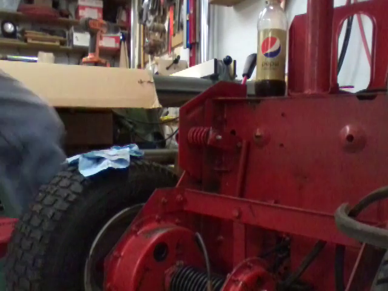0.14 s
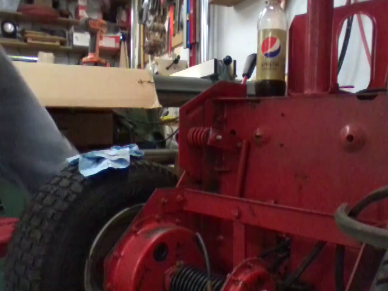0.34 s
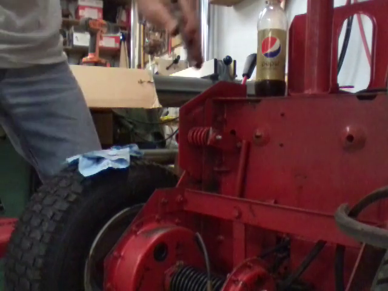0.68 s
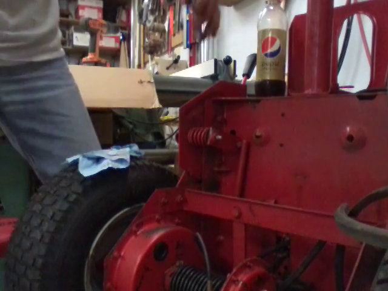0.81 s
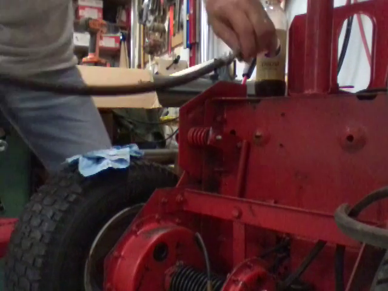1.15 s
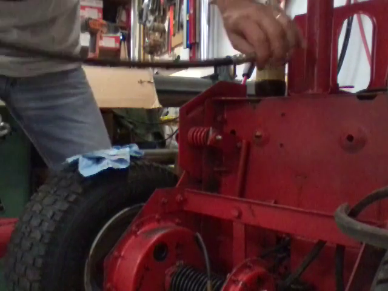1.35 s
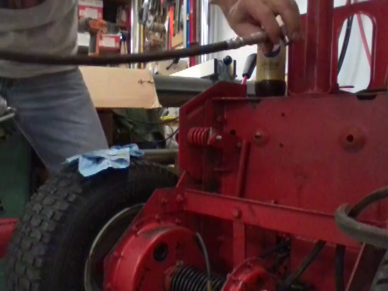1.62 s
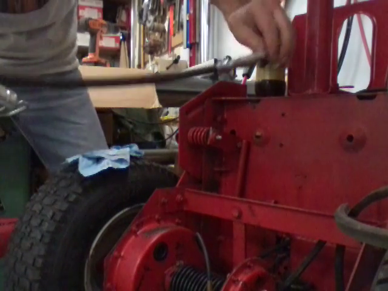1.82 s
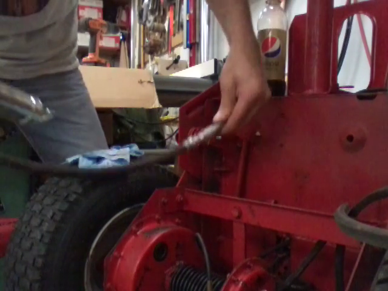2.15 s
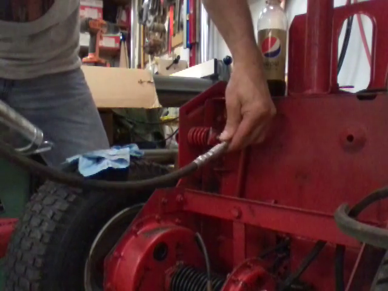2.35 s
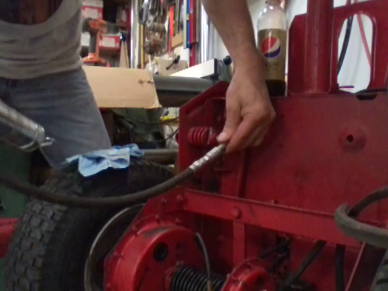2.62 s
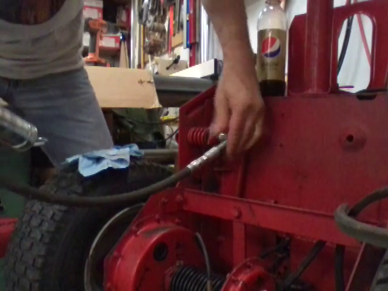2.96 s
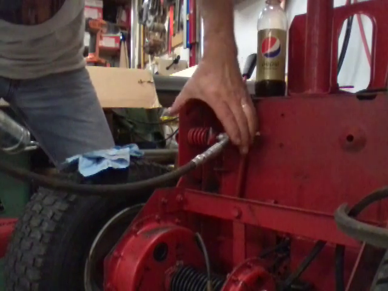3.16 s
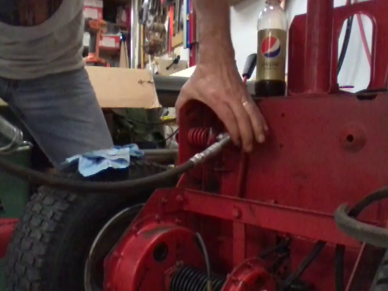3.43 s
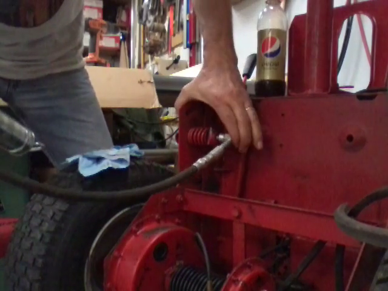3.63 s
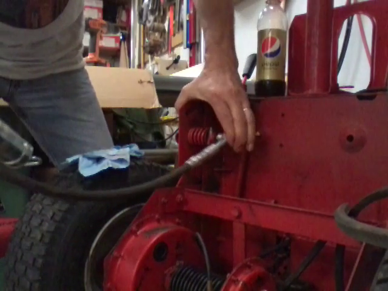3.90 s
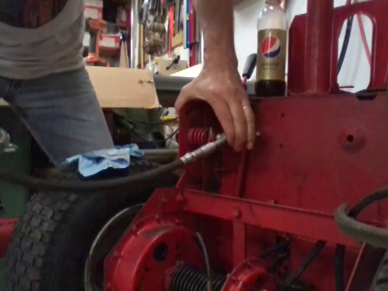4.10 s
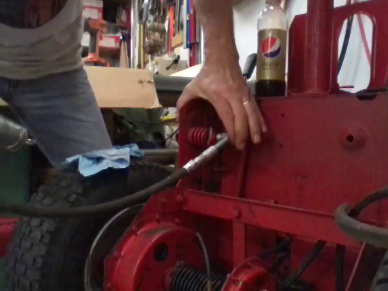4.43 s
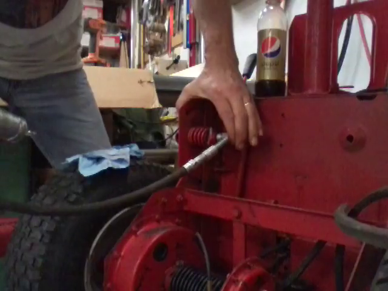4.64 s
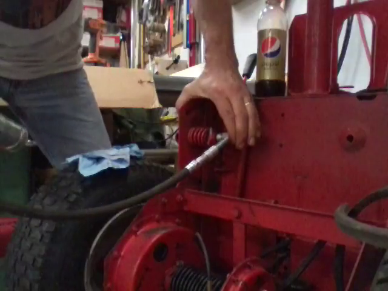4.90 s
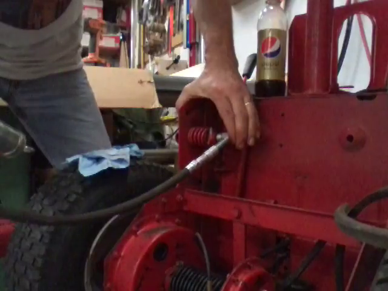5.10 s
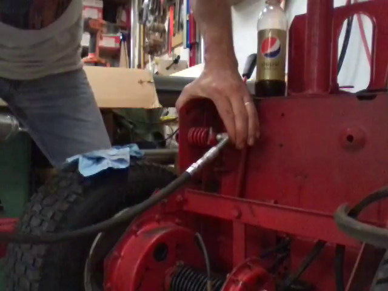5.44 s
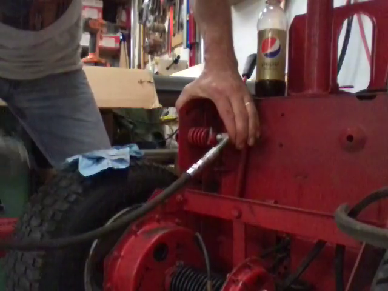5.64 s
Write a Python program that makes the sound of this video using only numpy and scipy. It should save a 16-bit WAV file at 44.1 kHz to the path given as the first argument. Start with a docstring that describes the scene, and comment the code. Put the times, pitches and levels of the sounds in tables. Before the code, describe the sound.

A hand grease gun clacks and rings against a machine in a small garage, after soft footsteps and light metal ticks.

```python
"""A hand grease gun is carried to a machine in a small garage, pushed onto a fitting and pumped.
Clothes brush, shoes thud, and the gun gives light taps and ticks of loose steel as it is handled.
Lever and coupler clack and set the gun ringing, the machine's frame is knocked, and the sliding
plunger hisses thinly. All this echoes in a cluttered room, over a faint hum and a pulsing whine."""
import sys
import numpy as np
from scipy import signal
from scipy.fft import rfft, irfft
from scipy.io import wavfile

SR = 44100
rng = np.random.default_rng(int(sys.argv[2]) if len(sys.argv) > 2 else 0)


def wav_record(signal):
    """Record a signal, one row per channel, as 16-bit PCM in the file named by sys.argv[1]."""
    frames = np.transpose(np.atleast_2d(signal))
    bounded = np.clip(frames, -1, 1)
    # unit amplitude maps onto the largest positive 16-bit level
    quanta = np.round(bounded * 32767).astype(np.int16)
    wavfile.write(sys.argv[1], SR, quanta)


N = 254232
T = np.arange(N) / SR
TOP_HZ = 15400  # upper edge of the sound

# Clacks of lever and coupler (t60 is the time a sound takes to fade by 60 dB):
# t/s, level/dB, rattle t60/s, ring/dB, rebound delay/s, rebound/dB, name of the tone colour
GUN_CLACKS = [(2.6137, -32.5, 0.09, -14.5, 0.076, -26, "light"),
              (2.772, -33.5, 0.045, -15.5, 0.0079, -12, "snap"),
              (3.9002, -26, 0.071, -20.5, 0.0023, -4, "hard")]
# Tone colour of two surfaces rubbing: f/Hz, level/dB
RUB_COLOUR = [(500, 3.5), (1500, 1), (3000, 4), (4500, 1.5), (6200, 4.5), (7500, -4), (9000, -10.5),
              (15000, -16)]


def undb(db):
    """Turn decibels into a factor to multiply by."""
    return 10 ** (np.asarray(db) / 20)


def unit(x):
    """Scale a sound to an average strength (rms) of 1."""
    return x / np.sqrt(np.mean(x ** 2))


def over_pitch(points, hz):
    """Read between (f/Hz, value) points, with all octaves equally wide."""
    f, value = np.transpose(points)
    return np.interp(np.log(hz + 1), np.log(f), value)


def colour(x, points, size=4096):
    """Filter a sound to the tone colour given by (f/Hz, level/dB) points."""
    gains = undb(over_pitch(points, np.fft.rfftfreq(size, 1 / SR)))
    cepstrum = irfft(np.log(gains))
    cepstrum[1:size // 2] *= 2  # folded forward, so the filter never sounds before a hit
    cepstrum[size // 2 + 1:] = 0
    response = irfft(np.exp(rfft(cepstrum)))
    return signal.fftconvolve(x, response)[:len(x)]


def band(x, lo_hz, hi_hz, order=2):
    """Keep the pitches between two edges."""
    hi_hz = min(max(hi_hz, lo_hz + 10), SR / 2 - 10)
    return signal.sosfilt(signal.butter(order, [lo_hz, hi_hz], "band", fs=SR, output="sos"), x)


def noise(size=N):
    """White noise: an even hiss."""
    return rng.standard_normal(size)


def walk(rate):
    """Random drift of about 1 either way, with `rate` new values a second."""
    knots = noise(size=1024)
    return np.interp(T * rate, np.arange(len(knots)), knots)


def fade(t60):
    """Half a second of dying away, by 60 dB every t60 seconds."""
    return np.exp(-np.log(1000) * T[:SR // 2] / t60)


def weigh(x, t60):
    """Give a blow the energy of a fade that starts at strength 1."""
    return x * np.sqrt(np.sum(fade(t60) ** 2) / np.sum(x ** 2))


def add(track, s, x):
    """Mix a sound into a track at s seconds."""
    i = max(int(s * SR), 0)
    track[i:i + len(x)] += x[:N - i]


def slide(start_s, length_s, attack_s, t60):
    """A sliding movement gathers speed, holds it and dies away."""
    rise = np.clip((T - start_s) / attack_s, 0, 1)
    since_end = np.maximum(T - start_s - length_s, 0)
    return rise * np.exp(-np.log(1000) * since_end / t60)


def chatter(t60, passes=3):
    """A dying run of tiny contacts that stirs all pitches about evenly."""
    envelope = fade(t60)
    x = noise(size=SR // 2) * envelope
    for _ in range(passes):
        spectrum = rfft(x)
        evened = irfft(spectrum / (np.abs(spectrum) + 1e-12), len(x))
        x = np.clip(weigh(evened, t60), -2 * envelope, 2 * envelope)
    return x


def ring(hz, t60):
    """One fading tone of a struck object."""
    return np.sqrt(2) * np.sin(2 * np.pi * hz * T[:SR // 2]) * fade(t60) * rng.choice([-1, 1])


def modes(table):
    """A struck object rings with all its natural tones at once."""
    return sum(undb(db) * ring(hz, t60) for hz, db, t60 in table) / np.sqrt(len(table))


def blow(rise_s, t60, low_hz, high_hz, scuff_db, boom_db):
    """One muffled blow: a dull body, the scuff of the surfaces that meet, and a low boom."""
    # Low tones that a blow stirs: f/Hz, level/dB, t60/s
    boom_tones = [(97.7, -6.5, 0.57), (201, 0, 0.18), (242.5, 0.5, 0.23), (329, 2.5, 0.26),
                  (498.7, 9, 0.109)]
    push = chatter(t60) * (1 - np.exp(-T[:SR // 2] / rise_s))  # softer contact builds up more slowly
    body = weigh(band(push, low_hz, high_hz, order=3), t60)
    scuff = weigh(colour(push, RUB_COLOUR), t60)
    boom = weigh(band(push, 166.0, 289), t60) + undb(-2) * modes(boom_tones)
    return body + undb(scuff_db) * scuff + undb(boom_db) * boom


def background(waver_db=2, drift_hz=1.397, whine_hz=15000, pulses_per_s=14.93):
    """Room air, rumble, a wavering hum, and a faint high whine that switches on and off."""
    # Tone colour of the room's air: f/Hz, level/dB
    air_colour = [(12, -41.5), (20, -23.5), (32, -15), (50, -13.5), (76, -4), (180, -18), (238, -16),
                  (324, -12), (362, -16.5), (465, -16.5), (505, -19), (1130, -25), (1980, -25), (2680, -27),
                  (15500, -30.5)]
    # Rise and fall of the low rumble: t/s, level/dB
    rumble_levels = [(0.0, -70.5), (0.37, -72), (0.61, -64.5), (1.67, -74.5), (2.85, -63.5), (3.08, -67),
                     (5.76, -76.5)]
    # Tones of the hum: f/Hz, level/dB
    hum_tones = [(68, -81), (90, -81.5), (176, -80.5), (324, -87.5), (410, -79.5), (467, -82.5), (645, -88)]
    air = undb(-67.5) * unit(colour(noise(), air_colour))
    rumble_db = np.interp(T, *np.transpose(rumble_levels))
    rumble = undb(rumble_db) * unit(band(noise(), 60, 118))
    hum = np.zeros(N)
    for hz, db in hum_tones:
        gain = undb(db + waver_db * walk(3.2))
        pitch = hz + drift_hz * walk(6)
        hum += gain * unit(np.sin(2 * np.pi * np.cumsum(pitch) / SR))
    whine_on = np.cos(2 * np.pi * pulses_per_s * (T - .036)) > 0
    whine = undb(-79) * unit(np.sin(2 * np.pi * whine_hz * T))
    whine += undb(-78) * unit(band(noise(), whine_hz - 200, whine_hz + 200))
    return air + rumble + hum + whine_on * whine


def cloth(grain_db=2.5):
    """Fabric brushes in uneven little slips."""
    # Sleeves and jeans moving: start/s, length/s, level/dB
    brushes = [(-.04, 0.19, -66.5), (0.456, 0.19, -58.5), (0.698, 0.092, -55), (0.871, 0.32, -64.5),
               (1.25, 0.2, -75)]
    speed = sum(undb(db) * slide(s, length, attack_s=0.04, t60=0.28) for s, length, db in brushes)
    return speed * undb(grain_db * walk(120)) * unit(colour(noise(), RUB_COLOUR))


def ticks(spread=0.048, strike_db=-2, top_hz=14800, buzz_db=-5.5, buzz_t60=.045):
    """Loose steel parts touch: one sharp strike, a chatter, and a brief buzz of close pitches."""
    # Touches of steel: t/s, level/dB, contact t60/s, lowest pitch/Hz, buzz pitch/Hz
    touches = [(0.0232, -41.5, 0.0077, 2640, 6100), (.056, -47, .005, 2500, 10500),
               (.419, -43.5, 0.017, 2050, 6730), (.6346, -45, 0.0068, 5000, 10400),
               (1.008, -41.5, 0.0037, 7900, 8350), (1.0372, -47, 0.068, 7300, 10800),
               (1.0692, -34, 0.038, 2030, 7500), (1.2587, -56, 0.019, 6000, 8050),
               (1.4112, -55, 0.019, 6960, 11100), (4.678, -45, 0.036, 3770, 4140)]
    # Tone colour of a tick: f/Hz, level/dB
    tick_colour = [(1000, -4), (2300, 1.5), (3150, -10.5), (4400, -3), (5400, -8), (6000, 2), (7600, -5.5),
                   (8600, -10.5), (11000, -12.5), (12300, -22), (15000, -12)]
    out = np.zeros(N)
    for s, db, t60, low_hz, buzz_hz in touches:
        contact = weigh(chatter(t60), t60) + undb(strike_db) * weigh(chatter(0.0015), t60)
        snap = band(colour(contact, tick_colour), low_hz, top_hz, order=3)
        buzz = band(chatter(buzz_t60), buzz_hz * (1 - spread), buzz_hz * (1 + spread))
        add(out, s, undb(db) * (weigh(snap, t60) + undb(buzz_db) * weigh(buzz, buzz_t60)))
    return out


def taps(rise_s=.002, t60=0.038, spread=.27):
    """Handling the gun and hose makes short hollow taps, each around its own pitch."""
    # Light bumps: t/s, level/dB, f/Hz
    bumps = [(.035, -53, 1800), (.116, -53, 1650), (1.421, -60.5, 2400), (3.238, -56, 2100),
             (3.241, -52, 1000), (3.805, -58, 970), (3.906, -36, 1030), (4.108, -61.5, 2100)]
    out = np.zeros(N)
    for s, db, hz in bumps:
        tap = blow(rise_s, t60, hz * (1 - spread), hz * (1 + spread), scuff_db=-8, boom_db=-16)
        add(out, s, undb(db) * tap)
    return out


def steps(rise_s=0.002, boom_db=-15):
    """The heel thuds on the floor while the sole slaps and scuffs."""
    # Shoes landing: t/s, level/dB, t60/s, slap/dB, top of the slap/Hz
    footfalls = [(0.479, -43, 0.087, 1, 1740), (.579, -49, 0.078, 0, 1200), (0.804, -52.5, 0.11, -18, 1000),
                 (1.1283, -35, 0.0323, -10, 990), (1.19, -53, 0.032, -10, 800)]
    out = np.zeros(N)
    for s, db, t60, slap_db, top_hz in footfalls:
        thud = blow(rise_s, t60, low_hz=164, high_hz=455, scuff_db=-28, boom_db=boom_db)
        slap = blow(rise_s, t60, low_hz=530, high_hz=top_hz, scuff_db=-6.5, boom_db=boom_db)
        add(out, s, undb(db) * (thud + undb(slap_db) * slap))
    return out


def lever(rebound_t60=0.037):
    """The steel of lever and coupler hits its stop, chatters and bounces once."""
    # Tone colour of each kind of clack, by name: f/Hz, level/dB
    clack_colours = { "light": [(150, -30), (450, -8.5), (750, -12.5), (1120, 0), (1350, -19), (1700, -6),
                     (2100, 2.5), (2450, -3.5), (2780, 7.5), (3150, 1.5), (4100, -4.5), (4550, -1),
                     (5400, -6), (6100, -2), (7500, -25), (9000, -32), (15000, -50)], "snap": [(40, -37),
                     (600, -24), (2100, 3.5), (3700, -1), (4500, -5.5), (5400, -8), (6080, 3), (6700, -7),
                     (7600, -5), (8600, -16), (9600, -11), (11500, -25), (15000, -23)],
                     "hard": [(150, -25.5), (700, -19), (1080, -15.5), (1400, -22), (2150, -9.5),
                     (2700, -9.5), (3200, -7.5), (4000, -7.5), (4500, -5), (5350, -11), (6100, 1.5),
                     (6600, -12), (7300, -16), (8600, -35.5), (15000, -46)]}
    out = np.zeros(N)
    for s, db, t60, _, rebound_s, rebound_db, kind in GUN_CLACKS:
        hit = colour(chatter(t60), clack_colours[kind])
        rebound = colour(chatter(rebound_t60), clack_colours[kind])
        add(out, s, undb(db) * weigh(hit, t60))
        add(out, s + rebound_s, undb(db + rebound_db) * weigh(rebound, rebound_t60))
    return out


def gun_ring():
    """Each clack leaves the barrel and handle ringing."""
    # Natural tones of the gun's steel: f/Hz, level/dB, t60/s
    steel_tones = [(1082, 10.5, 0.24), (1120, 4, .22), (1473, 3, 0.37), (2020, -3, 0.092),
                   (2087, 17.5, 0.096), (2316, 9, 0.24), (2780, 9, 0.083), (2860, 3.5, 0.4),
                   (3040, 0.5, 0.44), (4300, -14, .25), (4510, 7.5, 0.33), (4600, -8.5, 0.36),
                   (5100, -12, .25), (5610, 9, 0.27), (5500, 4, 0.13), (5990, 13, 0.13), (6270, 8, 0.096),
                   (6260, -10, 0.22), (7200, -5.5, 0.23)]
    out = np.zeros(N)
    for s, db, _, ring_db, *_ in GUN_CLACKS:
        add(out, s, undb(db + ring_db) * modes(steel_tones))
    return out


def knocks():
    """The machine's frame answers every knock in the same dull voice."""
    # Coupler and hand hitting the frame: t/s, level/dB, rise/s
    hits = [(2.647, -44.5, 0.02), (2.762, -43.5, 0.003), (2.775, -35.5, 0.01), (2.799, -35.5, 0.001),
            (3.872, -47.5, .004), (3.883, -46, .002), (3.913, -42.5, 0.0017)]
    out = np.zeros(N)
    for s, db, rise_s in hits:
        t60 = 0.07 + 4.6 * rise_s  # a softer push lasts longer
        knock = blow(rise_s, t60, low_hz=217, high_hz=1770, scuff_db=-8.5, boom_db=-9)
        add(out, s, undb(db) * knock)
    return out


def plunger(waver_db=0.5):
    """The sliding plunger rubs the barrel so that it sings, with more or less scrape in each stroke."""
    # Pitches at which the barrel sings: f/Hz, width/Hz, level/dB
    barrel_tones = [(5770, 28, 5), (6300, 182, -4), (6060, 190, 3.5)]
    # Tone colour of the scrape: f/Hz, level/dB
    scrape_colour = [(600, -11), (2000, -13.5), (4600, -13.5), (5200, -6.5), (6100, -3), (6800, 0.5),
                     (7200, -8), (7800, -7.5), (8200, -19), (14000, -24)]
    # Slides of the plunger: start/s, length/s, level/dB, scrape/dB
    strokes = [(3.17, .1, -75, -11), (3.33, 0.076, -85, 12), (4.43, 0.089, -76.5, -23),
               (5.224, 0.43, -65, .5)]
    song = unit(sum(undb(db) * unit(band(noise(), hz - width / 2, hz + width / 2, order=1))
                    for hz, width, db in barrel_tones))
    scrape = unit(colour(noise(), scrape_colour))
    out = np.zeros(N)
    for s, length, db, scrape_db in strokes:
        speed = slide(s, length, attack_s=0.04, t60=0.19)
        out += undb(db) * speed * (song + undb(scrape_db) * scrape)
    return out * undb(waver_db * walk(25))


def garage(x, build_s=0.0032, scatter_db=2.0):
    """Dense, uneven echoes bounce off nearby clutter; the bass lasts longest."""
    # How long the room echoes at each pitch: f/Hz, t60/s
    echo_times = [(100, 0.53), (400, 0.4), (1200, 0.39), (3000, 0.35), (6000, 0.4), (9000, 0.3),
                  (14000, 0.43)]
    size = SR // 2
    strength = undb(scatter_db * np.repeat(noise(size), 32)[:size])
    build_up = 1 - np.exp(-(T[:size] / build_s) ** 2)
    spectrum = rfft(noise(size) * strength * build_up)
    hz = np.fft.rfftfreq(size, 1 / SR)
    centres = np.geomspace(50, TOP_HZ, 10)
    tail = np.zeros(size)
    for centre, row in zip(centres, np.eye(len(centres))):  # each band fades at its own speed
        share = np.interp(np.log(hz + 1), np.log(centres), row)
        tail += irfft(spectrum * share, size) * fade(over_pitch(echo_times, centre))
    return signal.fftconvolve(x, tail / np.sqrt(np.sum(tail ** 2)))[:N]


def scene():
    """Every blow and rub is heard directly and as an echo from the room."""
    clack, tick, step = lever(), ticks(), steps()
    knock = knocks() + taps()
    rub = cloth() + plunger()
    room = garage(undb(-2.5) * clack + undb(-4.0) * tick + undb(-7.0) * step
                  + undb(-5.0) * knock + undb(-6.5) * rub)
    return (clack + gun_ring() + tick + step + knock + rub + room + background())[None]


def record(dry, smooth_s=0.059, open_db=-55, knee_db=4, lift_db=4):
    """A noise suppressor opens on loud sound, so hiss swells behind each blow; the top treble is cut."""
    pole = np.exp(-1 / (smooth_s * SR))
    power = signal.lfilter([1 - pole], [1, -pole], dry ** 2)
    level_db = 10 * np.log10(power + 1e-12)
    opening = (1 + np.tanh((level_db - open_db) / (2 * knee_db))) / 2  # 0 when quiet, 1 when loud
    treble_cut = signal.ellip(10, .2, 70, TOP_HZ, fs=SR, output="sos")
    return signal.sosfilt(treble_cut, dry * undb(lift_db * opening))


dry = scene()
out = record(dry)
wav_record(out)
```